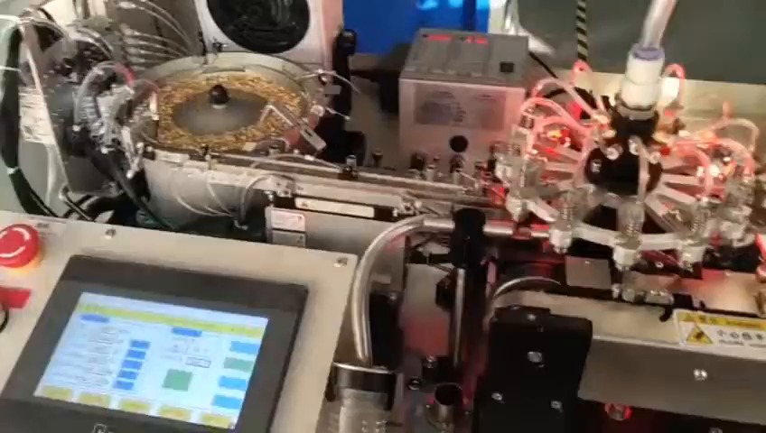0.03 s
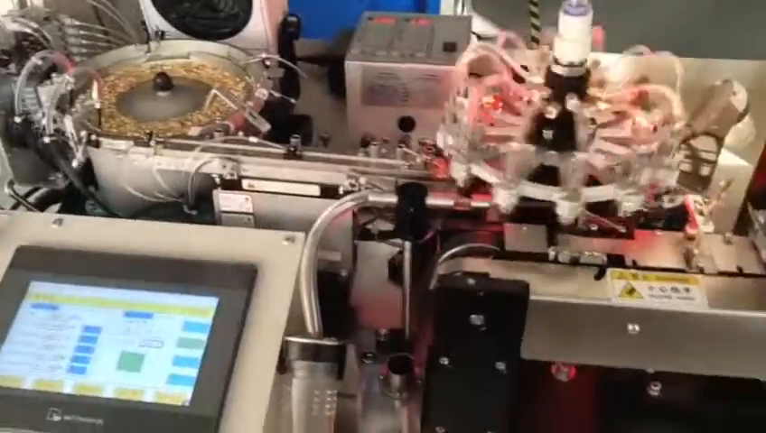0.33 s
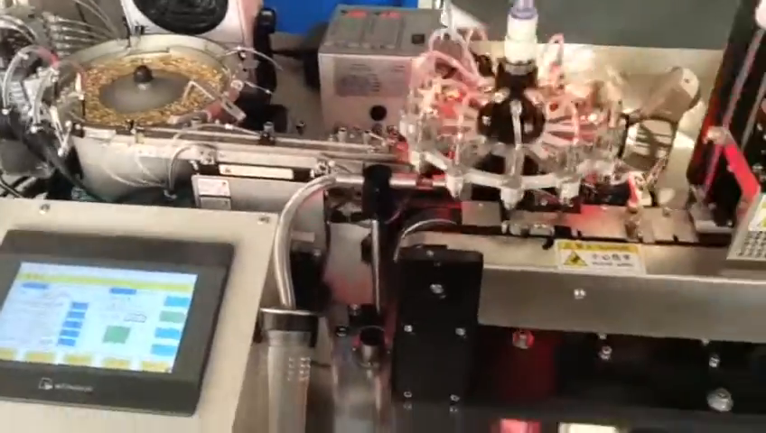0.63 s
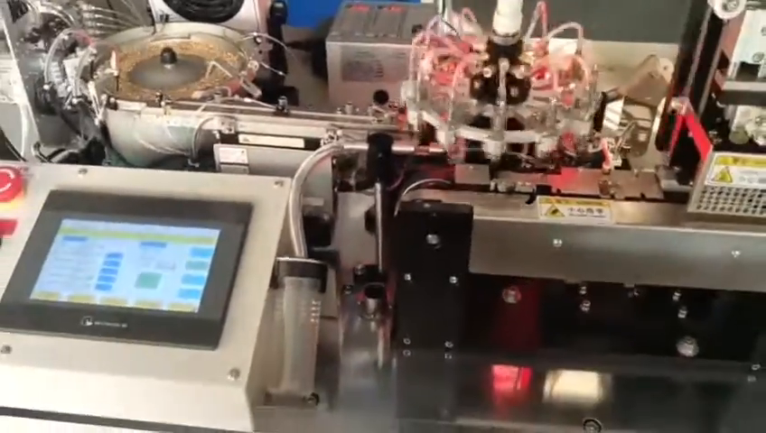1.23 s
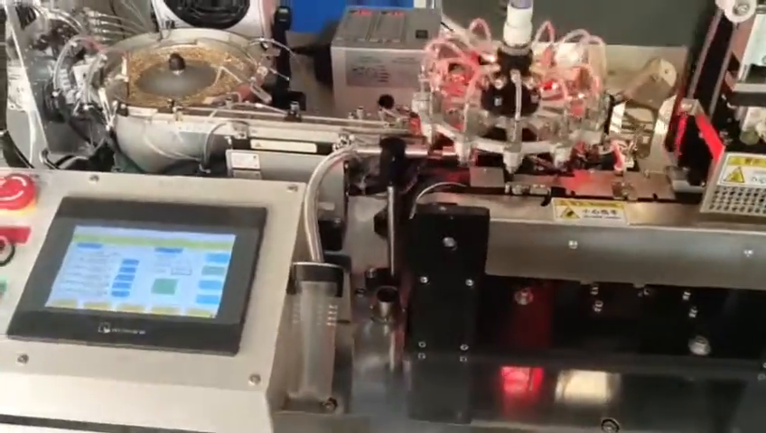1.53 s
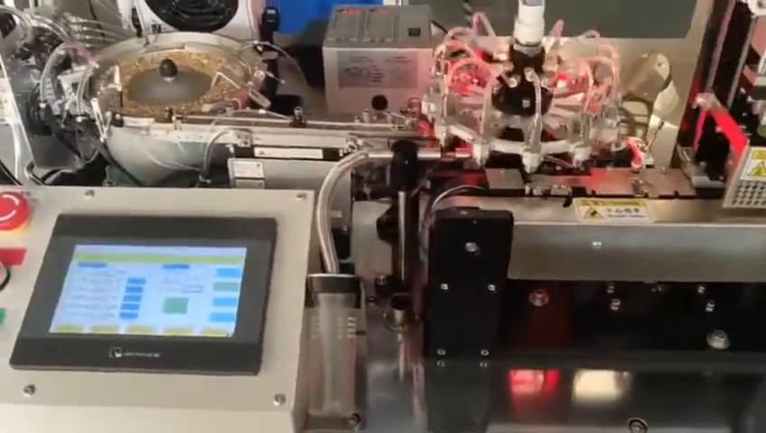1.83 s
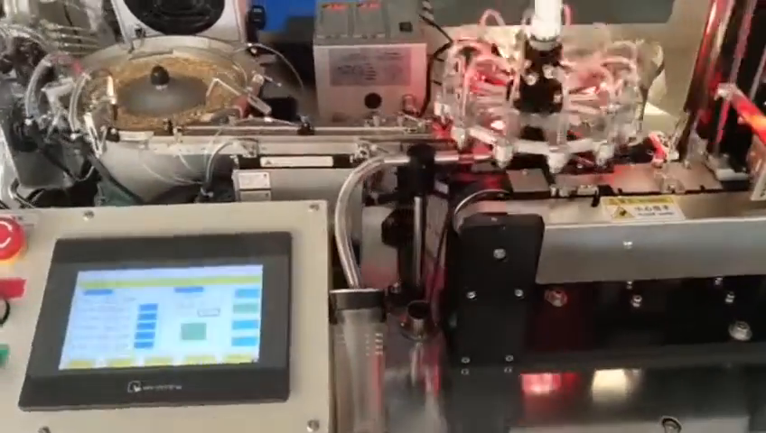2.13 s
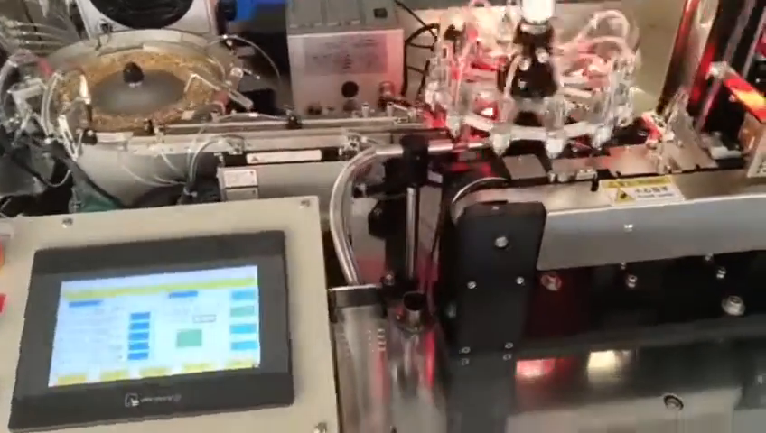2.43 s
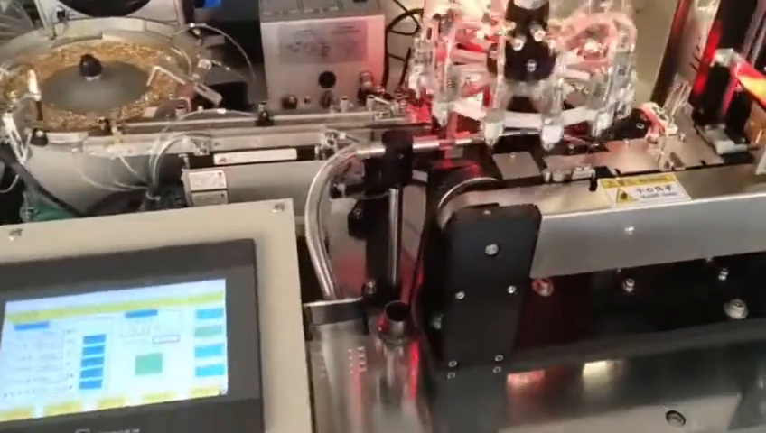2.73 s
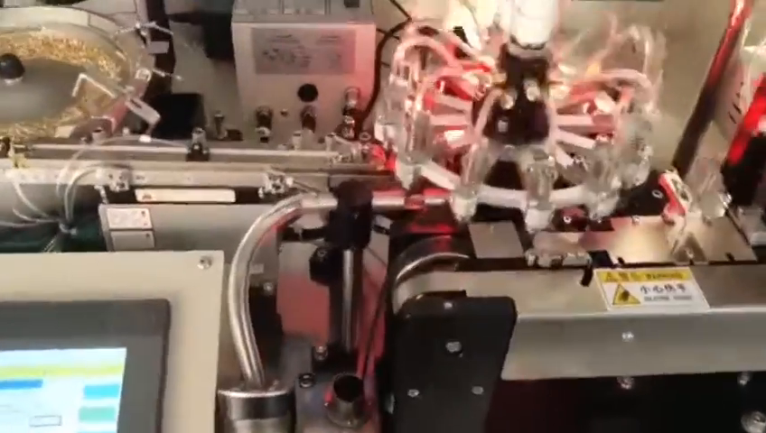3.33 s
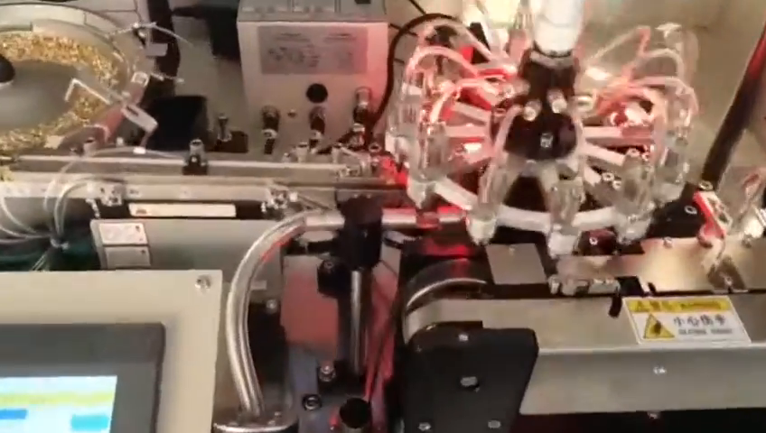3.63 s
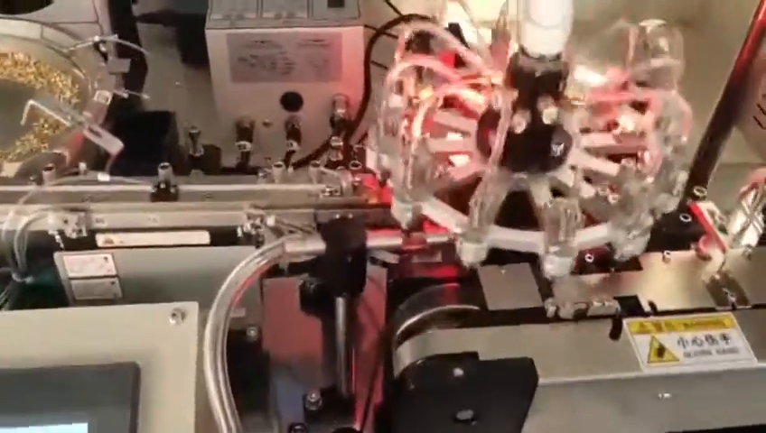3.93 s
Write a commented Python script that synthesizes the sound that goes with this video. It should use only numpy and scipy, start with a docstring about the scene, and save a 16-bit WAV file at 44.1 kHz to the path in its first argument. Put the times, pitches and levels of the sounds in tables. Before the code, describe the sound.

Close up, an automated packing machine hisses and knocks in a fast, even rhythm that picks up speed. Short whines and rumbles accompany the strokes, while a parts feeder hums and clinks against the steady rush of factory fans.

```python
"""An indexing packing machine, close up in a factory, speeds up to about seven strokes a second.
Each cycle the turret swings (frame rumble, a short whine as it brakes), the heads knock down and a
valve lets out a blast of air, later a small puff. A vibrating bowl feeder hums and its parts clink
over the fans and leaks of the hall. A gain control ducks the sound under each blast."""
import sys
import numpy as np
from scipy import signal
from scipy.fft import rfft, irfft
from scipy.io import wavfile

SR = 44100
rng = np.random.default_rng(int(sys.argv[2]) if len(sys.argv) > 2 else 0)


def store_wav(level_fs):
    """Save 16-bit WAV to argv[1]."""
    pcm = np.round(np.clip(np.atleast_2d(level_fs), -1, 1) * 32767)
    wavfile.write(sys.argv[1], SR, pcm.T.astype(np.int16))


N = 176400
T = np.arange(N) / SR

# Each row: stroke time in seconds, then knock, air blast, low whine, high whine and swing rumble in dB.
STROKES = [(0.0959,-20.5,-4,-34,-48,-28.5), (0.3064,-18.5,-5.5,-28,-31.5,-24),
           (0.4969,-20,-4.5,-42,-31,-30), (0.6865,-22,-3.5,-27.5,-28,-25), (0.877,-19,-2,-33.5,-30,-25),
           (1.066,-22,-5.5,-51,-34,-25.5), (1.2506,-21,-5.5,-48,-41,-26.5), (1.421,-21.5,-5,-27,-34,-28),
           (1.591,-24,-8.5,-24,-35,-23), (1.7609,-20.5,-6.5,-34,-37,-30), (1.9298,-21,-4,-26,-42,-29),
           (2.1004,-21,-6,-29,-35,-25), (2.2653,-21.5,-5,-28.5,-36,-30.5), (2.4159,-22,-4.5,-29,-36,-29),
           (2.5649,-23,-6,-29.5,-40,-37), (2.715,-22.5,-6.5,-22.5,-38,-30), (2.8649,-20,-4,-26,-35,-29),
           (3.0159,-18,-4,-27.5,-33,-32), (3.165,-22,-5,-30,-41,-32), (3.3139,-18,-5,-23,-40,-26),
           (3.452,-17.5,-2.5,-22,-33,-22.5), (3.5928,-19,-2,-22.5,-37,-26.5),
           (3.7313,-20,-1.5,-20.5,-35,-21.5), (3.8726,-19.5,-3,-26,-43.5,-25), (4.012,-13,-1,-20.5,-44,-25)]
PUFF_LAG_S = .1175


def from_db(db):
    """Decibels to gain."""
    return 10 ** (np.asarray(db) / 20)


def unit_rms(x):
    """Scale to unit power."""
    return x / np.sqrt(np.mean(x ** 2) + 1e-20)


def drift(rate_hz):
    """Smooth random wander, spread 1."""
    r = np.exp(-80 * np.pi * rate_hz / SR)
    slow = signal.lfilter([1], [1, -2 * r, r * r], rng.standard_normal(N // 40 + 2002))[2000:]
    return np.interp(np.arange(N) / 40, np.arange(len(slow)), unit_rms(slow))


def noise(spectrum):
    """Unit-power noise shaped by (Hz, dB) points."""
    hz, db = np.transpose(spectrum)
    bins_hz = np.arange(1, N // 2 + 2) * SR / N
    shape = from_db(np.interp(np.log(bins_hz), np.log(hz), db))
    return unit_rms(irfft(rfft(rng.standard_normal(N)) * shape, N))


def resonant_noise(hz, width_hz):
    """Noise sent twice through one resonance, unit power."""
    r = np.exp(-2 * np.pi * width_hz / SR / np.sqrt(2))
    section = [1 - r, 0, r - 1, 1, -2 * r * np.cos(2 * np.pi * hz / SR), r * r]
    return unit_rms(signal.sosfilt([section, section], rng.standard_normal(N)))


def resonances(modes):
    """Resonances driven by turbulence or shaking."""
    return sum(from_db(db) * resonant_noise(hz, width_hz) for hz, width_hz, db in modes)


def ring(times_s, db, hz, t60_s):
    """One struck mode; level and pitch may vary per blow."""
    out, age_s = np.zeros(N + 3 * SR), T[:int(min(t60_s, 2) * SR)]
    decay = np.exp(-np.log(1000) * age_s / t60_s)
    for start_s, blow_db, blow_hz in np.broadcast(times_s, db, hz):
        i = int(start_s * SR)
        out[i:i + len(age_s)] += from_db(blow_db) * decay * np.sin(2 * np.pi * blow_hz * age_s)
    return out[:N]


def gate(start_s, attack_s, hold_s, release_s):
    """Linear attack, exponential release from hold_s after the start."""
    attack = np.clip((T - start_s) / attack_s, 0, 1)
    return attack * np.exp(-np.clip((T - start_s - hold_s) / release_s, 0, 20))


def swell(centre_s, width_s):
    """Gaussian rise and fall."""
    return np.exp(-.5 * np.minimum(((T - centre_s) / width_s) ** 2, 100))


def rough_tone(hz, roughness=0.41):
    """Tone with amplitude and phase jitter."""
    jitter = drift(99) + 1j * drift(98)
    return np.real((1 + roughness * jitter) * np.exp(2j * np.pi * hz * T))


def hall(approach_db_per_s=0.18):
    """Leaks whistle; the rush of fans and leaks flickers and grows as the microphone nears."""
    # Each row: frequency in Hz, relative density in dB.
    rush_spectrum = [(20, -32), (45, -0.5), (70, -9.5), (100, 6.5), (200, 6), (400, 2.5), (600, -2),
                     (1000, 1), (1800, -5), (2600, -7.5), (4200, -9), (7000, -12.5), (10500, -12),
                     (12000, -16), (14500, -33)]
    # Each row: frequency in Hz, width in Hz, level in dB.
    leak_whistles = [(3654, 12, -54), (7120, 60, -51), (10110, 120, -46.5)]
    rush_db = -30.5 + 2.5 * drift(37.4) + approach_db_per_s * (T - T.mean())
    return from_db(rush_db) * noise(rush_spectrum) + resonances(leak_whistles)


def feeder(drive_hz=219.4, wander_hz=0.63, flutter_db=1.5):
    """The bowl feeder hums at its drive rate."""
    # Each row: multiple of the drive rate, RMS level in dB.
    harmonics = [(1, -33.5), (2, -52.5)]
    phase = 2 * np.pi * np.cumsum(drive_hz + wander_hz * drift(2.4)) / SR
    hum = sum(from_db(db) * np.sin(k * phase) for k, db in harmonics)
    return np.sqrt(2) * from_db(flutter_db * drift(7)) * hum


def turret(low_hz=979, high_hz=1258, edge_s=0.0051):
    """Each swing shakes the frame and brakes with a rough two-note whine over gear noise."""
    # Each row: frequency in Hz, width in Hz, relative level in dB.
    frame_modes = [(98.8, 17.7, -4.5), (130.8, 11.3, 0), (172.8, 18.5, 1), (234, 21, -8), (319.6, 27, -6),
                   (364.4, 17, -3), (444, 37, -11)]
    # Heavier rumbling. Each row: centre in seconds, width in seconds, level in dB.
    rumble_spells = [(1.562, .026, -24), (1.70, 0.052, -28), (1.885, 0.027, -28.5)]
    # Each row of both: frequency in Hz, relative density in dB.
    rumble_spectrum = [(60, -25), (110, 0), (200, -9), (330, 1), (440, -3.5), (600, -15), (1600, -15.5),
                       (4000, -30)]
    gear_spectrum = [(500, -15), (830, 4.5), (1000, 12), (1280, -11), (1500, 2.5), (2000, -19), (3500, -30)]
    swing, low, high = 0, 0, 0
    cycles_s = np.gradient(np.transpose(STROKES)[0])
    for (stroke_s, _, _, low_db, high_db, swing_db), cycle_s in zip(STROKES, cycles_s):
        brake_s = stroke_s - 0.0331 - 0.12 * (cycle_s - cycles_s.mean())   # earlier in slow cycles
        swing += from_db(swing_db - 8) * swell(stroke_s - 0.025, width_s=0.049)
        low += from_db(low_db) * gate(brake_s, edge_s, hold_s=2 * edge_s, release_s=0.019)
        high += from_db(high_db) * gate(brake_s, edge_s, hold_s=0.021, release_s=edge_s)
    whine = low * (rough_tone(low_hz) + from_db(-5) * noise(gear_spectrum)) + high * rough_tone(high_hz)
    frame = swing * unit_rms(resonances(frame_modes))
    heavy = sum(from_db(db) * swell(centre_s, width_s) for centre_s, width_s, db in rumble_spells)
    return frame + from_db(-2.5) * whine + heavy * noise(rumble_spectrum)


def knocks(spread_db=2.5, detune=.04, crack_s=0.0032):
    """Heads land with a crack and chatter, each at its own pitch; the puff valve thuds and taps them."""
    # Each row: frequency in Hz, level in dB, T60 in seconds.
    head_modes = [(113, -13, 0.046), (484, -3, 0.022), (730, -4.5, 0.0074), (907, -5, 0.029),
                  (1510, -8.5, 0.014), (2200, -7, 0.038), (2514, -7, 0.021), (3400, -20, 0.005),
                  (5400, -24, .012)]
    # Touch, seat, rebounds. Each row: offset from the stroke in seconds, level in dB.
    contacts = [(-.0014, -7), (.0003, -0.5), (.0014, -3), (.0034, -12.5), (.0066, -13)]
    # Each row: frequency in Hz, relative density in dB.
    crack_spectrum = [(2600, 2), (9000, -2), (14500, -2)]
    strokes_s, knock_db = np.transpose(STROKES)[:2]
    offsets_s, contact_db = np.transpose(contacts)
    puffs_s = strokes_s + PUFF_LAG_S
    metal = ring(puffs_s, db=-21.5, hz=356, t60_s=0.014)   # valve thud
    for k, (hz, mode_db, t60_s) in enumerate(head_modes):
        scatter_db = rng.normal(0, spread_db, (len(strokes_s), len(contacts)))
        blow_db = knock_db[:, None] + 4 + contact_db + mode_db + scatter_db
        blow_hz = hz * (1 + rng.normal(0, detune, (len(strokes_s), 1)))
        metal += (-1) ** k * ring(strokes_s[:, None] + offsets_s, blow_db, blow_hz, t60_s)
        metal += ring(puffs_s, mode_db - 32, hz, t60_s)   # valve tap
    crack = sum(from_db(db - 1.5) * gate(s, crack_s / 10, 0, crack_s) for s, db in zip(strokes_s, knock_db))
    return metal + crack * noise(crack_spectrum)


def air_valve(surge_db=5, waver_db=3):
    """A jet excites nearby cavities: a blast per stroke, a duller spit on shutting, then a puff."""
    # Each row: frequency in Hz, relative density in dB.
    jet_spectrum = [(900, -16), (1800, 0), (2500, 8), (3200, 1.5), (4200, 0), (5400, 5.5), (8500, 6.5),
                    (10800, 11), (11900, 3), (14500, -4.5)]
    # Each row: frequency in Hz, width in Hz, relative level in dB.
    cavity_modes = [(5520, 330, 0), (6430, 210, 1), (7220, 260, 2), (7840, 420, -4.5), (9400, 61, -0.5),
                    (10300, 400, 1)]
    flow, spit = 0, 0
    for stroke_s, _, blast_db, *_ in STROKES:
        blast = gate(stroke_s, attack_s=0.003, hold_s=0.049, release_s=0.022)
        surge = 1 + (from_db(surge_db) - 1) * swell(stroke_s + 0.021, width_s=0.014)
        puff = gate(stroke_s + PUFF_LAG_S, attack_s=0.0013, hold_s=0.0039, release_s=0.0081)
        flow += from_db(blast_db - 22) * blast * surge + from_db(-30) * puff
        spit += from_db(blast_db - 26) * swell(stroke_s + 0.053, width_s=0.0067)
    cavities = sum(from_db(waver_db * drift(3.6)) * resonances([mode]) for mode in cavity_modes)
    jet = unit_rms(noise(jet_spectrum) + from_db(-6) * unit_rms(cavities))
    return flow * jet + spit * resonant_noise(hz=3240, width_hz=1650)


def panel(direct, echo_gain=0.25):
    """A hard panel adds one reflection; its delay shifts as the microphone moves."""
    # Each row: time in seconds, delay in seconds.
    delay_path = [(0, 0.0011), (1.5, 0.0013), (2.8, 0.001266), (4, 0.0013)]
    delay_s = np.interp(T, *np.transpose(delay_path))
    return direct + echo_gain * np.interp(T - delay_s, T, direct)


def loose_parts(clinks_per_s=14, clink_db=-33):
    """Small parts clink at random in the feeder; one rings on."""
    # Each row: frequency in Hz, T60 in seconds.
    part_modes = [(1520, 0.063), (2160, 0.021), (3320, 0.064), (3650, 0.038), (4840, 0.061)]
    out = ring(0.69, db=-41, hz=3250, t60_s=1.8)
    for hz, t60_s in part_modes:
        gap_draw, level_draw = rng.random((200, 2)).T
        times_s = np.cumsum(-np.log(gap_draw)) * len(part_modes) / clinks_per_s
        heard = times_s < T[-1]
        out += ring(times_s[heard], clink_db + 10 * (level_draw[heard] - .5), hz, t60_s)
    return out


def scene():
    """The machine over the rush of the hall, mono."""
    background = hall()
    return (knocks() + panel(air_valve()) + turret() + feeder() + loose_parts() + background)[None]


def record(dry):
    """Treble-keyed gain control, a brief opening silence, a steep top cut."""
    sense_hz, sense_s, lag_s = 3970, 0.0028, 0.0015
    threshold_db, slope = -30.5, 0.71
    silence_s, fade_s, cutoff_hz = .072, 0.0016, 14500
    treble = signal.sosfilt(signal.butter(2, sense_hz, "high", fs=SR, output="sos"), dry)
    r = np.exp(-1 / (sense_s * SR))
    treble_db = 10 * np.log10(signal.lfilter([1 - r], [1, -r], treble ** 2) + 1e-12)
    lagged_db = np.interp(T - lag_s, T, treble_db[0])
    gain = from_db(-slope * np.maximum(lagged_db - threshold_db, 0))
    fade_in = np.clip((T - silence_s) / fade_s, 0, 1)
    top_cut = signal.ellip(14, .2, 110, cutoff_hz, fs=SR, output="sos")
    return signal.sosfilt(top_cut, dry * gain * fade_in)


dry = scene()
out = record(dry)
store_wav(out)
```